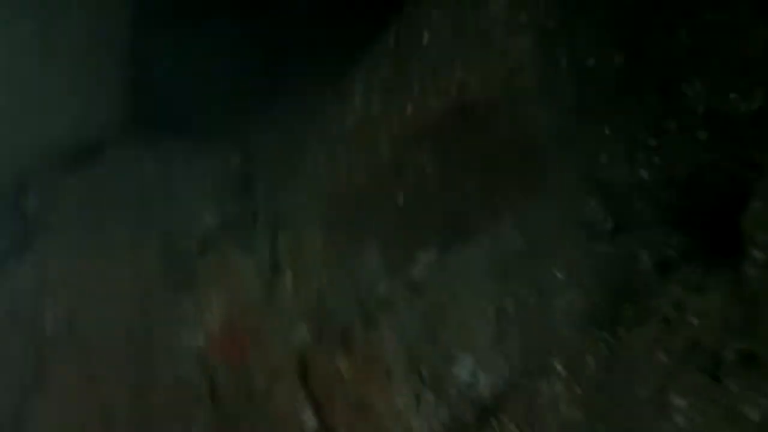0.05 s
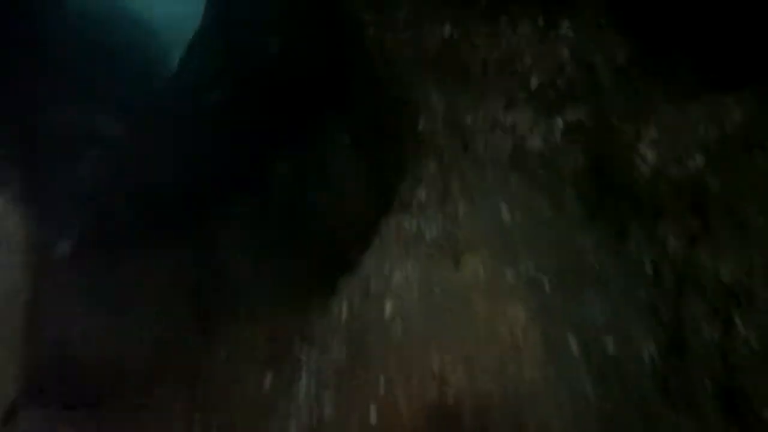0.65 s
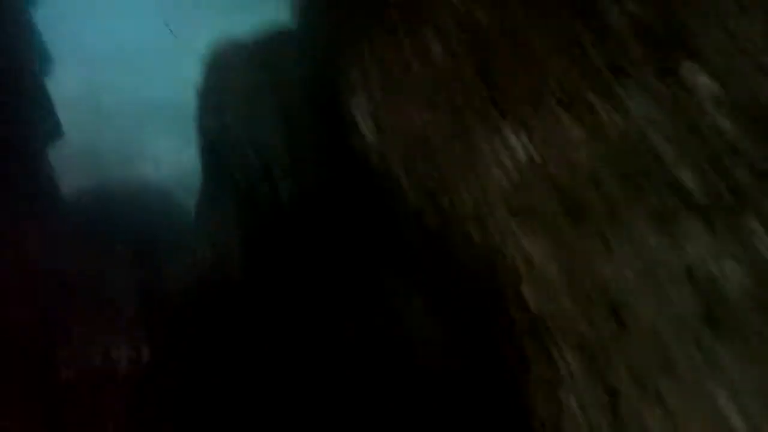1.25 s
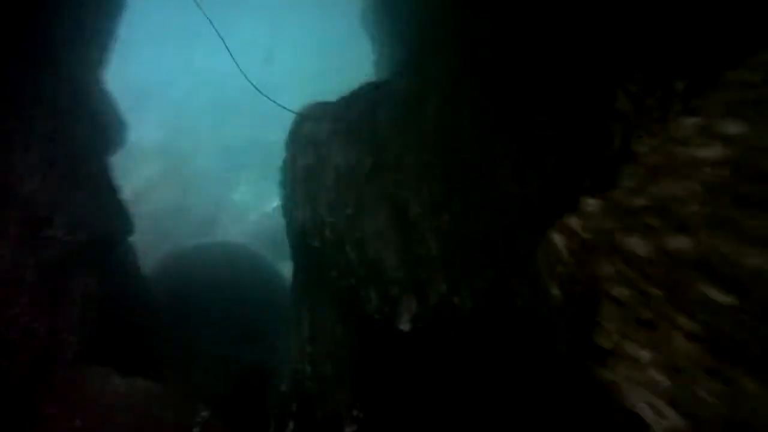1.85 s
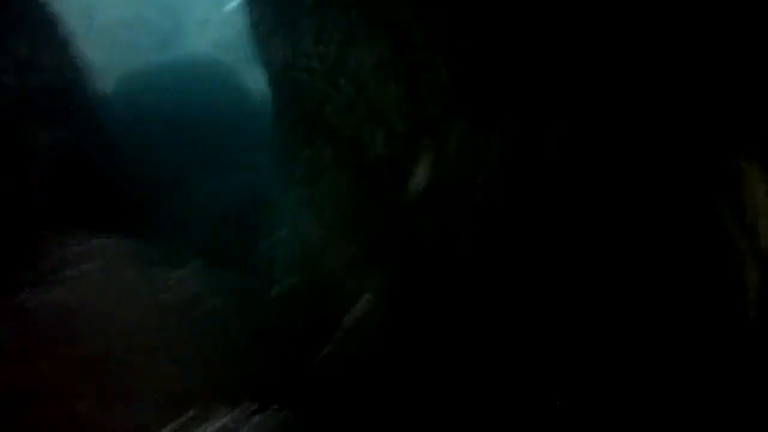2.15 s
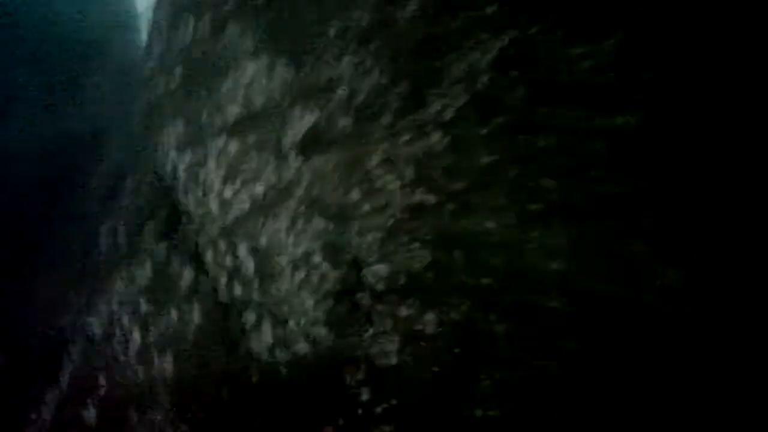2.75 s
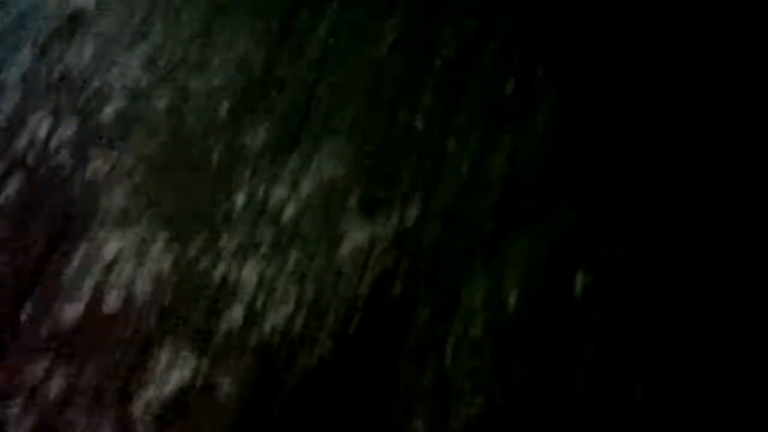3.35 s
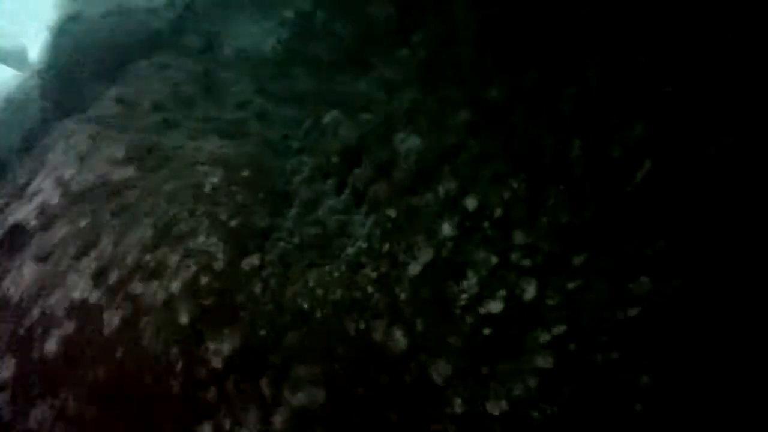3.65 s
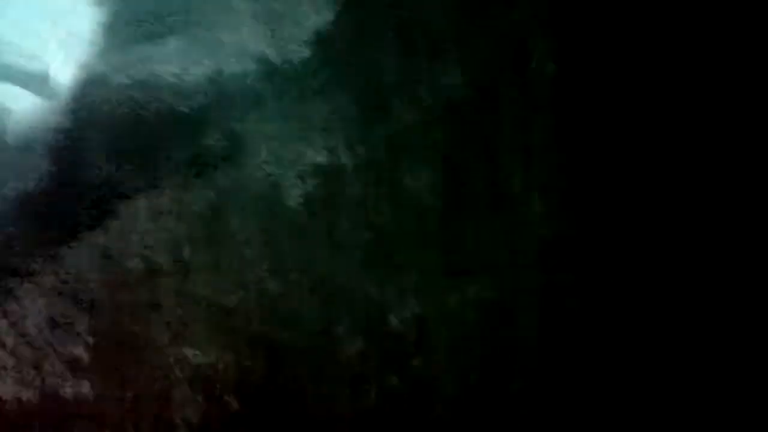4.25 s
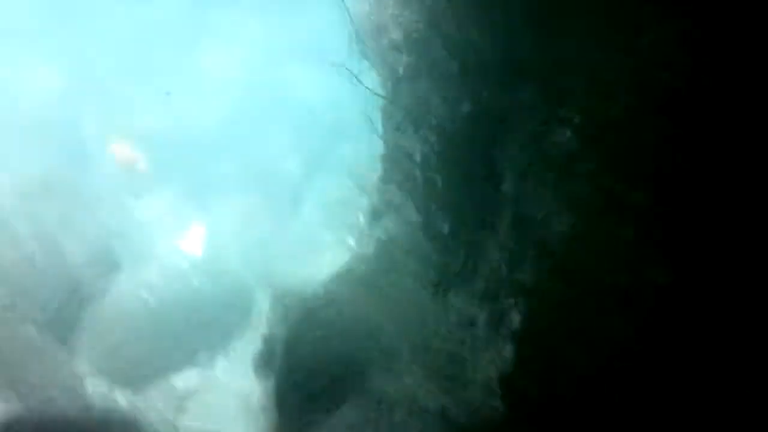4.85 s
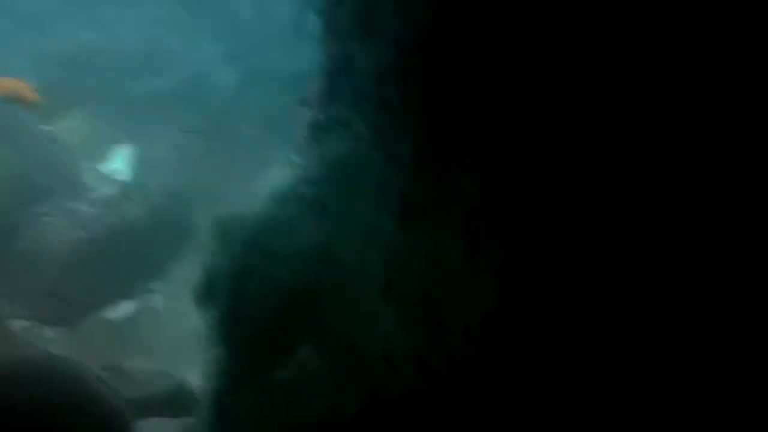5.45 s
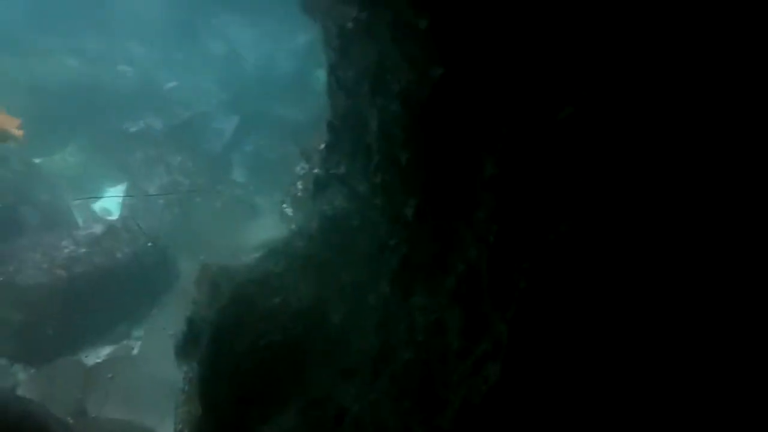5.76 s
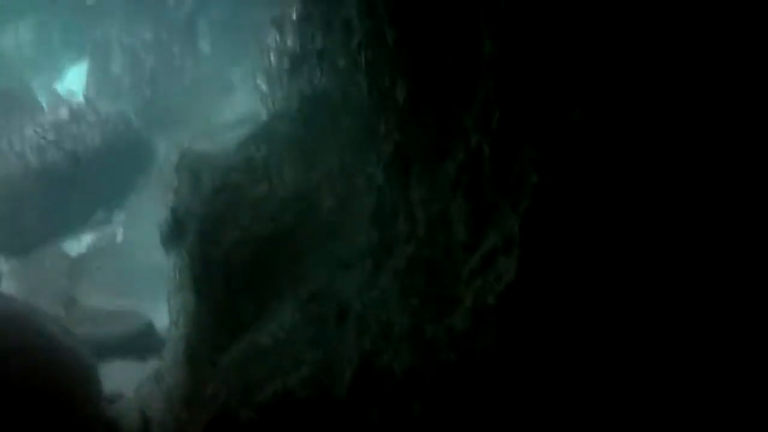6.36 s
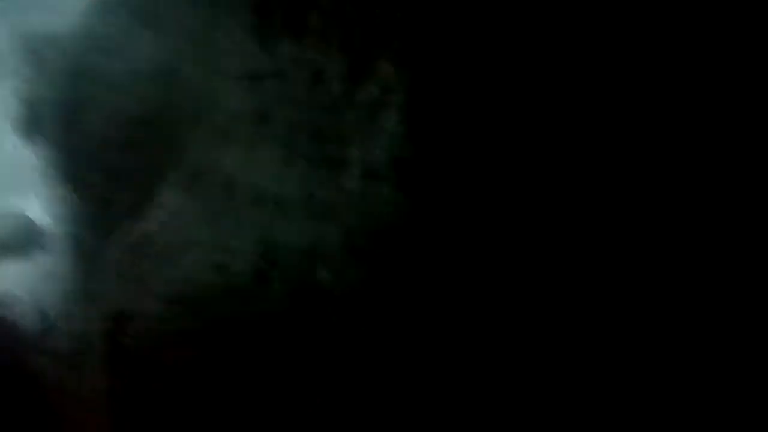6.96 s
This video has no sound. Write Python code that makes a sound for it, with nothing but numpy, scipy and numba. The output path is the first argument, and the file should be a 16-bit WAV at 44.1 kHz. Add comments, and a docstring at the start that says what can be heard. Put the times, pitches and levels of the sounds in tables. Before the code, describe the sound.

Underwater in a sea cave, heard from inside a watertight camera housing. A deep, muffled surge rumbles throughout, with short sloshes, low glugs of trapped air and soft thuds. Dull knocks tap the case, mostly early on. About two thirds of the way through comes one heavy bump with a burst of gurgling, then the water churns on as before.

```python
"""Adrift in a sea cave

Heard from inside a camera's watertight housing. The surge presses slowly on the case, water sweeps
past in sloshes, air pockets glug around it, and the case takes dull knocks and one heavy bump.
The camera's gain control pumps with the surge in small steps, each leaving a faint tick."""
import sys
import numpy as np
from scipy import signal
from scipy.fft import rfft, irfft, next_fast_len
from scipy.io import wavfile
from scipy.ndimage import uniform_filter1d
from numba import njit

SR = 44100
rng = np.random.default_rng(int(sys.argv[2]) if len(sys.argv) > 2 else 0)


def file_out(sig):
    """Save sig as 16-bit WAV at sys.argv[1]."""
    # one column per channel
    cols = np.atleast_2d(sig).T
    # limit, then scale
    lim = np.clip(cols, -1, 1)
    pcm = np.round(lim * 32767).astype(np.int16)
    wavfile.write(sys.argv[1], SR, pcm)


N = 309128
T = np.arange(N) / SR


def undb(db):
    """Decibels to gain."""
    return 10 ** (np.asarray(db) / 20)


def colour(x, response):
    """EQ a sound along a curve of f/Hz, gain/dB."""
    hz, db = np.transpose(response)
    size = next_fast_len(N + SR)
    bins_hz = np.maximum(np.fft.rfftfreq(size, 1 / SR), 1)
    gain = undb(np.interp(np.log(bins_hz), np.log(hz), db))
    return irfft(rfft(x, size) * gain, size)[:N]


def add(out, start_s, sound):
    """Mix a sound in at its start time."""
    i = max(int(start_s * SR), 0)
    out[i:i + len(sound)] += sound[:max(N - i, 0)]


def envelope(start_s, length_s, attack_s, release_s):
    """Rise smoothly toward 1; die away once length_s has passed."""
    t = T - start_s
    rise = np.sin(np.pi / 2 * np.clip(t / attack_s, 0, 1)) ** 2
    return rise * np.exp(-np.clip((t - length_s) / release_s, 0, 20))


def flutter(rate_hz):
    """Slewed random sample-and-hold, with a spread near 1."""
    size = max(int(SR / rate_hz), 2)
    held = rng.standard_normal(N)[np.arange(N) // size]
    return uniform_filter1d(held, size)


def turbulence(spectrum, steady_s):
    """Turbulent pressure: coloured noise, its level ridden flat over steady_s."""
    noise = colour(rng.standard_normal(N), spectrum)
    size = max(int(steady_s * SR), 2)
    power = uniform_filter1d(uniform_filter1d(noise ** 2, size), size)
    return noise / np.sqrt(power)


def bubble(hz, swell_s, octaves_per_s):
    """A pulsing air pocket swells to peak 1 and dies away as its pitch slides."""
    t = T[:int(10 * swell_s * SR)]
    swell = t / swell_s * np.exp(1 - t / swell_s)
    pitch_hz = hz * 2 ** (octaves_per_s * t)
    return swell * np.sin(2 * np.pi * np.cumsum(pitch_hz) / SR)


def surge(trim_db=-1, rise_s=0.0011, fall_s=0.018, nudge_db=-17, nudge_count=8):
    """The swell leans on the case with deep pressure and shoves it to and fro, with weak random nudges."""
    # slow swell of pressure on the case: t/s, level/dB before trim
    swell = [(0, -19), (0.7, -18), (1.2, -20), (1.6, -20), (1.95, -19.5), (2.38, -16.5), (2.55, -19.5),
             (3.05, -20.5), (3.25, -18), (4.1, -21.5), (4.55, -18), (4.75, -24.5), (4.95, -26),
             (5.25, -16.5), (6.1, -17.5), (6.8, -17.5), (7.0, -22)]
    # sub-heavy spectrum of that pressure: f/Hz, relative level/dB
    spectrum = [(4, -3.5), (12, 2), (24, 4), (35, -1.5), (50, -4), (75, -16), (110, -23), (200, -34),
                (400, -75), (3000, -140)]
    # the stronger shoves: t/s, level/dB
    shoves = [(.287, -10.5), (.535, -3), (.908, -8), (1.118, -1), (1.471, -8), (1.586, -8), (1.704, -7),
              (2.266, -12.5), (2.427, -0.5), (2.705, -8), (2.901, -5.5), (2.980, -9.5), (3.072, -9),
              (3.269, -10.5), (3.503, -3), (3.900, -3.5), (4.039, -9), (4.207, -5), (4.305, -9.5),
              (4.387, -13), (5.047, -9.5), (5.101, -6.5), (5.246, -2), (5.591, -6.5), (5.682, -2),
              (5.918, -9.5), (5.976, -10), (6.072, -14), (6.232, -7.5), (6.575, 2), (6.724, -9.5),
              (6.870, -4.5)]
    swell_db = np.interp(T, *np.transpose(swell))
    out = undb(swell_db + trim_db) * turbulence(spectrum, steady_s=0.065)
    lead_s = .03
    t = T[:SR // 5] - lead_s
    push = 1 / (np.exp(-t / rise_s) + np.exp(t / fall_s))
    nudges = [(when * T[-1], nudge_db) for when in rng.random(nudge_count)]
    for k, (s, db) in enumerate(shoves + nudges):
        add(out, s - lead_s, (-1) ** k * undb(db) * push / push.max())
    return out


def knocks(trim_db=1, ring_t60_s=0.072, min_contact_ms=.75):
    """A soft contact pushes the case in and out; the wall rings on, damped by the water."""
    # hits on the housing: t/s, level/dB before trim, contact/ms, ring f/Hz, ring against thud/dB
    hits = [(.010, -12, 0.92, 397, -15), (0.105, -8.5, 0.87, 477, -5.5), (.174, -18, 0.58, 466, -1),
            (.431, -7.5, 0.57, 433, -11), (0.528, -20, 0.77, 435, -3), (0.79, -6.5, 0.71, 409, -8),
            (0.827, -6, 0.64, 391.5, -5), (1.088, -11, 0.81, 414, -2.5), (1.144, -11.5, 1.3, 375, 3.5),
            (1.183, -7.5, .9, 393, -2), (1.448, -5, 0.85, 403, -2.5), (2.109, -15.5, 0.71, 390, -24.5),
            (2.133, -15, 0.48, 311, 1), (2.553, -13, 1.2, 400, -37), (3.223, -14, 1.4, 376.5, -5.5),
            (4.589, 2.5, 1.12, 283, -25.5), (4.99, -0.5, 1.02, 236, -19), (6.964, -5.5, 0.62, 242, -3)]
    out = np.zeros(N)
    lead_s = .008
    t = T[:SR // 4] - lead_s
    after = np.maximum(t, 0)
    decay = np.exp(-np.log(1000) * after / ring_t60_s)
    for s, db, contact_ms, hz, ring_db in hits:
        u = t * 1000 / max(contact_ms, min_contact_ms)  # time in contact lengths
        thud = -u * np.exp((1 - u ** 2) / 2)
        ring = -np.sin(2 * np.pi * hz * after) * decay * np.tanh(u) ** 2
        add(out, s - lead_s, undb(db + trim_db) * (thud + undb(ring_db) * ring))
    return out


def glugs(trim_db=1):
    """Large pockets of trapped air pulse, each on a note of its own."""
    # air pockets: t/s, f/Hz, level/dB before trim, swell/s, glide/(octaves per s)
    pockets = [(0.175, 469, -29.5, 0.019, 0), (.250, 423, -24.5, 0.013, -0.5),
               (.408, 606, -24.5, 0.0089, 5), (.470, 441, -22, 0.0074, -0.5), (0.983, 435, -25.5, 0.023, 3),
               (1.060, 618, -30, 0.0066, 7.5), (1.188, 405, -26.5, 0.011, 0.5),
               (1.245, 307, -13.5, 0.01, -11), (1.516, 95.8, -22, 0.021, -2),
               (1.811, 302.4, -19.5, 0.029, 2.5), (2.159, 252.2, -13, 0.0145, 1.5),
               (2.555, 210, -13, 0.0089, -1.5), (2.63, 191.7, -17, 0.0064, 2.5),
               (2.677, 490, -26, 0.0082, 6), (2.769, 104, -10, 0.0081, 3), (3.520, 86.6, -17.5, 0.011, 12),
               (3.687, 175.3, -12, 0.011, -3.5), (3.756, 276.5, -18, 0.0075, 2),
               (3.808, 128.8, -14.5, 0.0088, 0.5), (4.594, 210, 4.5, 0.0113, -2.5),
               (4.639, 132.6, -4, 0.014, 2.5), (4.673, 160, -8, 0.03, -1), (4.763, 130.4, -15, 0.017, -3),
               (5.200, 373, -23.5, 0.0074, -2.5), (5.326, 119.5, -15, 0.0053, 3),
               (5.382, 113.5, -8.5, 0.0038, -14), (5.556, 224.2, -17.5, 0.013, -4),
               (5.769, 426, -19.5, 0.013, 2.5), (6.233, 92, -15.5, 0.0067, -1.5)]
    out = np.zeros(N)
    for s, hz, db, swell_s, glide in pockets:
        add(out, s, undb(db + trim_db) * bubble(hz, swell_s, glide))
    return out


def churn(rumble_db=-1.5, gurgle_db=-2, froth_db=-5):
    """Stirred water rumbles past, with small bubbles gurgling on top."""
    # low body of the moving water: f/Hz, relative level/dB
    rumble_spectrum = [(50, -14), (100, -2), (160, -1), (240, 3.5), (310, -7.5), (400, -16), (600, -40),
                       (1000, -62), (5000, -125)]
    # its upper gurgle: f/Hz, relative level/dB
    gurgle_spectrum = [(200, -17.5), (340, 4.5), (450, 4), (540, -11), (660, -25), (850, -24.5),
                       (1300, -39.5), (2100, -36), (2800, -45.5), (5000, -47.5), (12000, -82)]
    rumble = undb(rumble_db) * turbulence(rumble_spectrum, steady_s=0.046)
    bubbles = undb(froth_db) * froth()
    gurgle = undb(gurgle_db) * turbulence(gurgle_spectrum, steady_s=0.056) + bubbles
    rumble_gain, gurgle_gain = stirring()
    return rumble_gain * rumble + gurgle_gain * gurgle


def stirring(calm_rumble_db=-37.5, calm_gurgle_db=-49, flutter_db=2):
    """Faders for rumble and gurgle: calm water, sloshes and the wake add in power and flutter together."""
    # swirls sweeping past the case: t/s, length/s, relative rumble/dB, relative gurgle/dB
    sloshes = [(0.0, 0.223, -34, -31.5), (.32, .035, -18.5, -22.5), (0.392, .14, -27, -34),
               (0.608, 0.21, -54, -38.5), (0.759, .07, -22, -29.5), (0.849, 0.044, -26.5, -32),
               (0.925, 0.27, -32, -34.5), (1.272, 0.17, -30, -36), (1.431, 0.044, -19.5, -20),
               (1.65, 0.039, -34, -36.5), (1.789, 0.084, -19.5, -32.5), (1.915, 0.051, -22, -26.5),
               (2.069, .16, -24, -28.5), (2.33, 0.078, -23, -30.5), (2.514, 0.1006, -28, -57),
               (2.662, 0.029, -24.5, -26.5), (2.832, 0.039, -41, -40.5), (3.107, 0.04, -22.5, -35),
               (3.18, 0.12, -22.5, -37), (3.294, 0.25, -27, -42), (3.641, .16, -19.5, -39),
               (3.866, 0.041, -28, -36), (3.999, 0.28, -21, -36.5), (4.296, .25, -25.5, -39.5),
               (4.762, 0.013, -18, -25), (4.86, .12, -17.5, -31.5), (4.992, 0.13, -23.5, -34.5),
               (5.17, 0.04, -30, -32.5), (5.236, 0.12, -33, -61), (5.554, 0.1, -24.5, -35.5),
               (5.751, 0.1335, -19.5, -34), (6.164, 0.09, -27, -51.5), (6.351, 0.22, -25.5, -33),
               (6.733, .035, -14, -30), (6.826, 0.071, -28.5, -38.5), (6.916, .06, -20.5, -34)]
    rumble_power, gurgle_power = undb(calm_rumble_db) ** 2, undb(calm_gurgle_db) ** 2
    for s, length_s, rumble_db, gurgle_db in sloshes:
        slowing_s = 0.057 * length_s  # longer sloshes swell and fade more slowly
        swirl = envelope(s, length_s, attack_s=.016 + slowing_s, release_s=.012 + slowing_s)
        rumble_power += (undb(rumble_db) * swirl) ** 2
        gurgle_power += (undb(gurgle_db) * swirl) ** 2
    wake_rumble, wake_gurgle = wake()
    gains = np.sqrt([rumble_power + wake_rumble ** 2, gurgle_power + wake_gurgle ** 2])
    return gains * undb(flutter_db * flutter(rate_hz=25))


def wake(start_s=4.588, attack_s=0.018, rumble_db=-4.5, gurgle_db=-13.5):
    """Envelopes of the wake thrown up by the heavy bump; its gurgle dies sooner than its rumble."""
    rumble = undb(rumble_db) * envelope(start_s, attack_s, attack_s, release_s=0.09)
    gurgle = undb(gurgle_db) * envelope(start_s, attack_s, attack_s, release_s=0.054)
    return rumble, gurgle


def froth(low_hz=320, high_hz=2400, swell_cycles=3, spread_db=20.5, count=1400):
    """A crowd of small bubbles of random size, at rms 1."""
    # how the case muffles small bubbles: f/Hz, relative gain/dB
    through_case = [(200, -9), (450, 2), (560, -12.5), (850, -26), (1300, -25), (2100, -21.5),
                    (3000, -36.5), (12000, -69.5)]
    crowd = np.zeros(N)
    for when, pitch, strength, slide in rng.random((count, 4)):
        hz = low_hz * (high_hz / low_hz) ** pitch
        blip = bubble(hz, swell_cycles / hz, octaves_per_s=2 * slide)
        add(crowd, when * T[-1], undb(spread_db * strength) * blip)
    muffled = colour(crowd, through_case)
    return muffled / np.sqrt(np.mean(muffled ** 2))


def buffet(db=-23.5):
    """While the current runs fast, eddies shed by the case make a deep flutter."""
    # pressure of the eddies: f/Hz, relative level/dB
    spectrum = [(30, -22), (55, -2.5), (75, -0.5), (100, -5.5), (160, -27), (400, -68.5), (3000, -140)]
    current = envelope(start_s=3.3, length_s=1.95, attack_s=0.3, release_s=0.3)
    return undb(db) * current * turbulence(spectrum, steady_s=0.31)


def squelches(spread_octaves=0.56, swell_cycles=0.95, count=14):
    """Water squeezed through a gap breaks into a handful of bubbles of like size."""
    # tight bursts of bubbles: t/s, length/s, top level per bubble/dB, centre f/Hz
    bursts = [(.405, 0.042, -43, 750), (1.06, .03, -40.5, 900), (1.386, .04, -44, 980),
              (1.389, .04, -44, 2100), (2.060, 0.058, -38.5, 930), (2.400, .025, -44, 1113),
              (2.674, 0.036, -28.5, 503), (2.678, 0.035, -37.5, 2100), (2.678, 0.022, -43, 3660),
              (4.535, 0.02, -9.5, 390), (5.868, .025, -43, 1024), (6.531, 0.033, -39.5, 800),
              (6.75, .02, -19, 432)]
    out = np.zeros(N)
    for s, length_s, db, centre_hz in bursts:
        for k, (when, pitch, strength) in enumerate(rng.random((count, 3))):
            hz = centre_hz * 2 ** (spread_octaves * (pitch - .5))
            blip = bubble(hz, swell_cycles / hz, octaves_per_s=0.87)
            add(out, s + length_s * (k + when) / count, undb(db) * strength * blip)
    return out


def snaps(decay_s=0.0023, half_width=0.076):
    """Tiny bright cracks in the water, each a noise burst in one narrow band."""
    # sharp cracks: t/s, peak level/dB, f/Hz
    cracks = [(1.927, -46, 3440), (3.149, -33.5, 2456), (3.148, -38, 3920), (3.15, -26, 8630),
              (4.108, -39, 3890), (4.589, -33, 9150)]
    out = np.zeros(N)
    t = T[:SR // 20]
    for s, db, hz in cracks:
        band = signal.butter(2, [hz * (1 - half_width), hz * (1 + half_width)], "band", fs=SR, output="sos")
        burst = rng.standard_normal(len(t)) * np.exp(-t / decay_s)
        crack = signal.sosfilt(band, burst)
        add(out, s, undb(db) * crack / np.abs(crack).max())
    return out


def hiss(db=-86):
    """The microphone's own faint noise floor."""
    return undb(db) * rng.standard_normal(N)


@njit
def gain_control(x, limit_db=-13., step_db=0.7535, range_db=8., clock_hz=2405., hold_ticks=13., up_ticks=8.):
    """Gain in dB: a step down per clock tick while too loud; after a hold, a step up every up_ticks."""
    out = np.zeros(len(x))
    db, quiet_ticks = 0., 0.
    limit = 10 ** (limit_db / 20)
    for i in range(len(x)):
        if int(i * clock_hz / SR) != int((i - 1) * clock_hz / SR):
            quiet_ticks += 1
            if abs(x[i]) * 10 ** (db / 20) > limit:
                db, quiet_ticks = max(db - step_db, -range_db), -hold_ticks
            elif quiet_ticks >= up_ticks:
                db, quiet_ticks = min(db + step_db, 0.), 0.
        out[i] = db
    return out


def scene():
    """Everything reaches the one microphone through the case."""
    return (surge() + churn() + buffet() + knocks() + glugs() + squelches() + snaps() + hiss())[None]


def record(dry, drive_db=3.0, low_cut_hz=12, knee=9, top_hz=15800):
    """The camera's chain: pumping gain, low cut, soft clipping on the heavy bump, treble EQ, high cut."""
    # the camera's notchy treble: f/Hz, gain/dB
    camera_eq = [(1000, 1.5), (2350, -0.5), (2750, -17), (3100, -1.5), (4300, 0), (4900, -1.5), (5600, -17),
                 (7200, -13), (8100, -28), (9600, -7), (11000, -17.5), (12000, -6), (14500, -8)]
    low_cut = signal.butter(1, low_cut_hz, "high", fs=SR, output="sos")
    high_cut = signal.ellip(8, .2, 70, top_hz, fs=SR, output="sos")
    driven = dry[0] * undb(drive_db)
    pumped = driven * undb(gain_control(driven))
    trimmed = signal.sosfilt(low_cut, pumped)
    clipped = trimmed / (1 + np.abs(trimmed) ** knee) ** (1 / knee)
    return signal.sosfilt(high_cut, colour(clipped, camera_eq))[None]


dry = scene()
out = record(dry)
file_out(out)
```